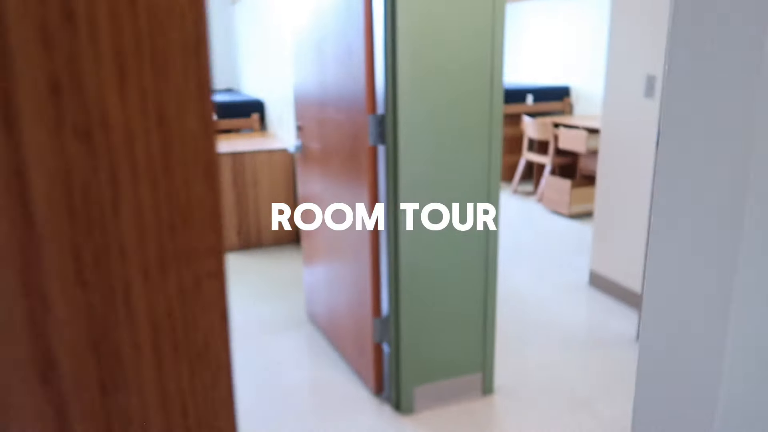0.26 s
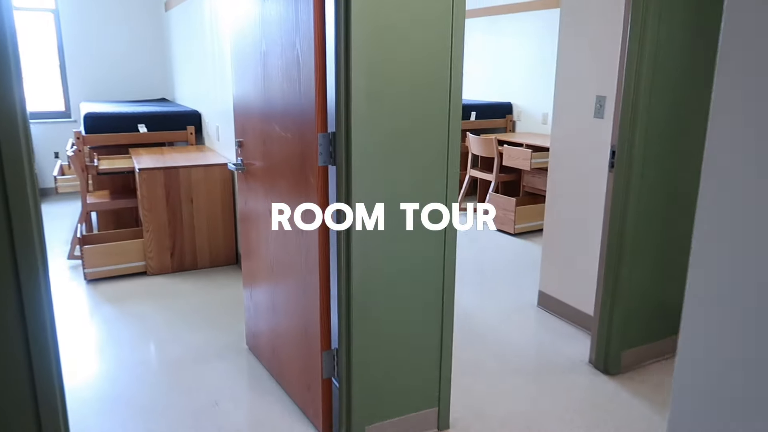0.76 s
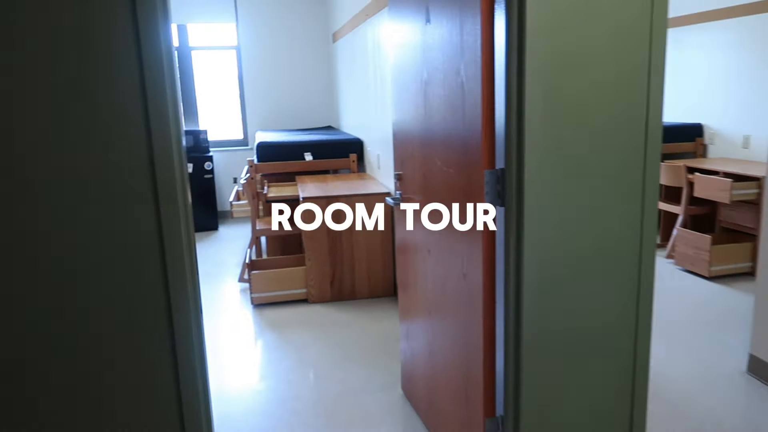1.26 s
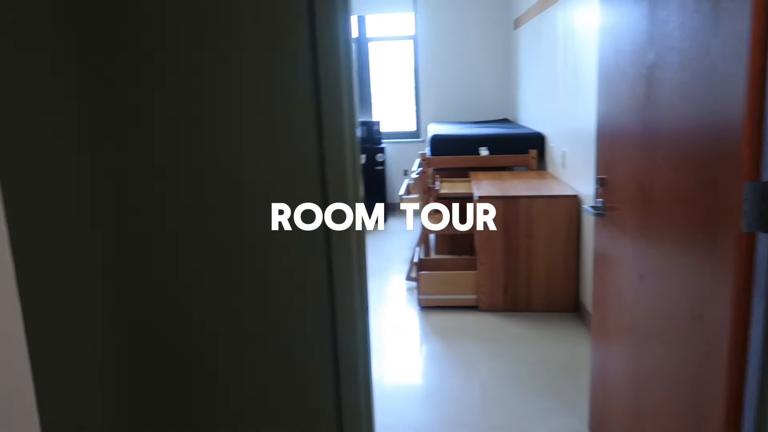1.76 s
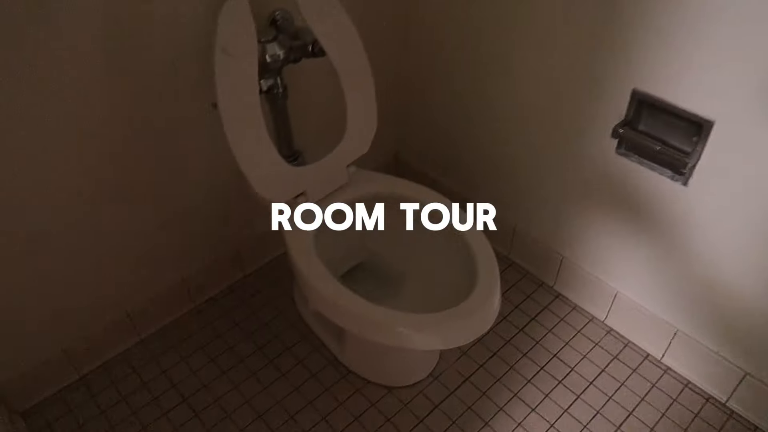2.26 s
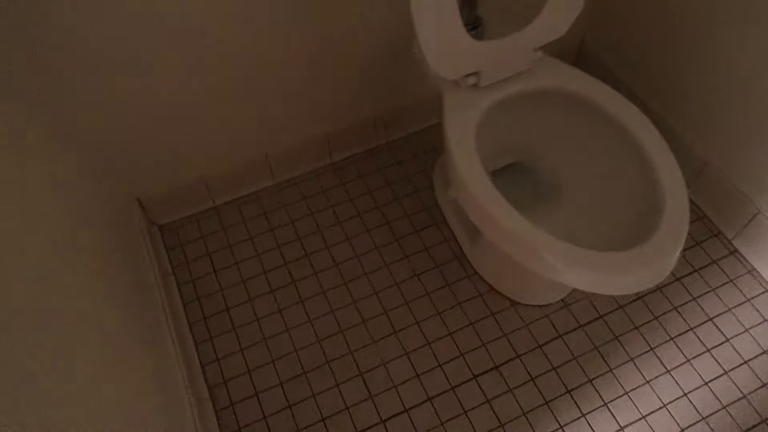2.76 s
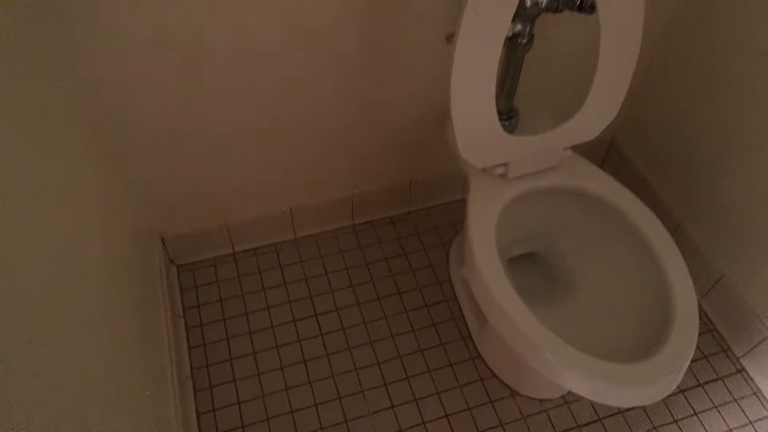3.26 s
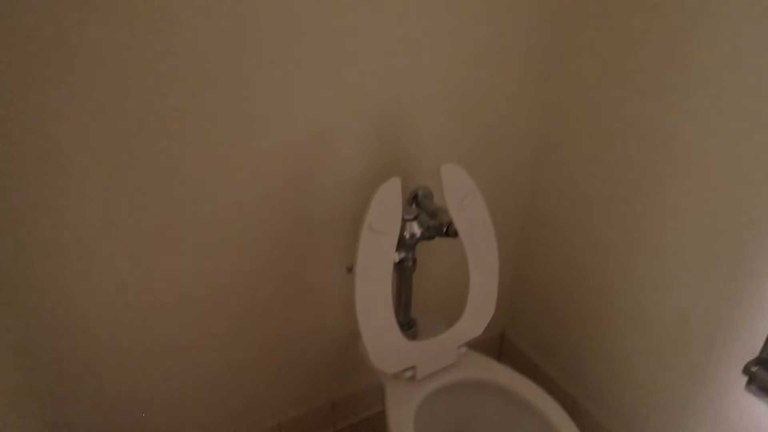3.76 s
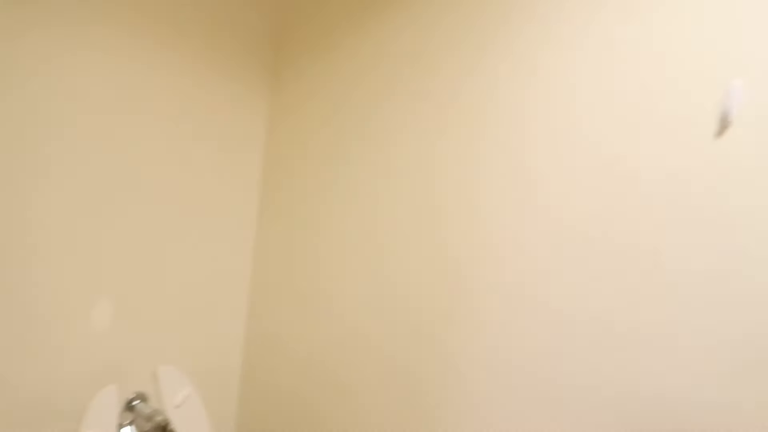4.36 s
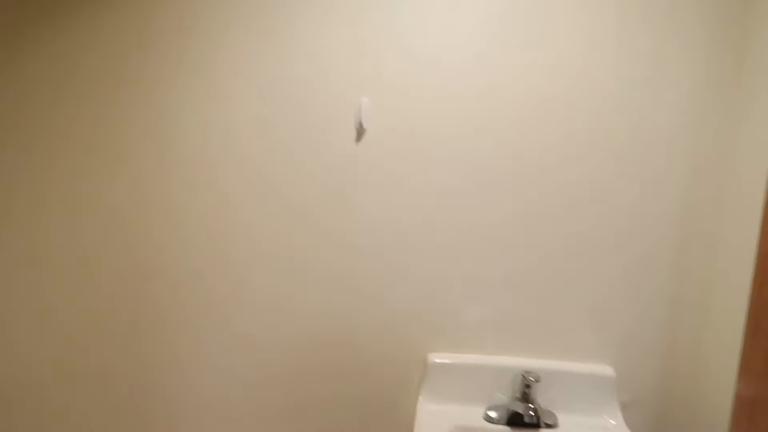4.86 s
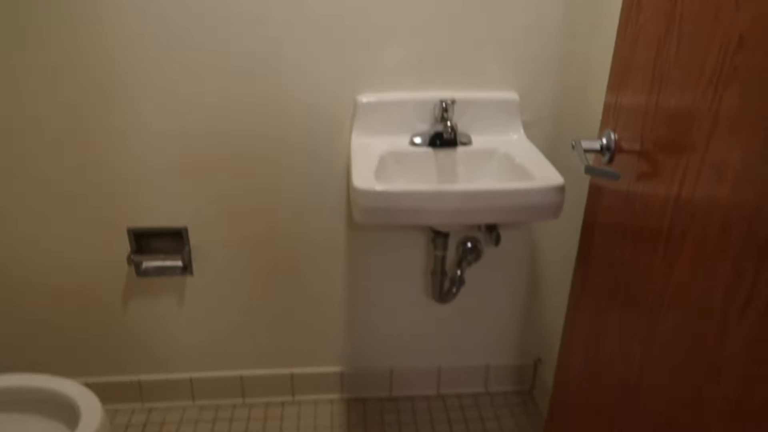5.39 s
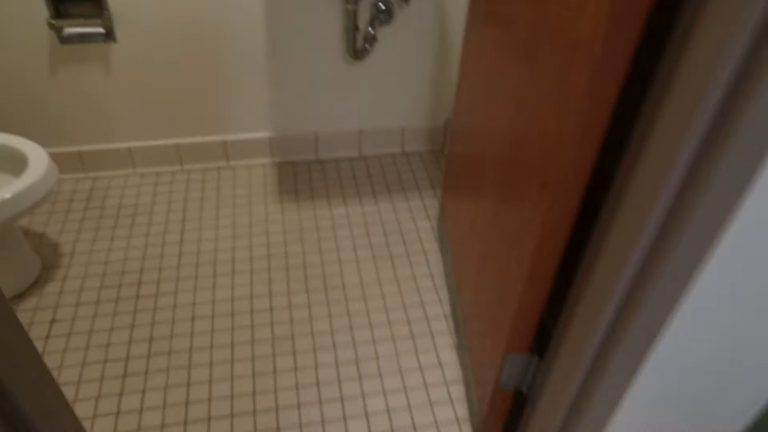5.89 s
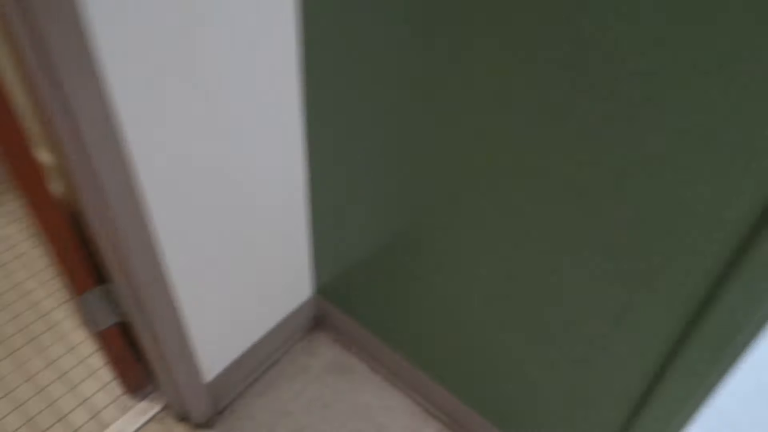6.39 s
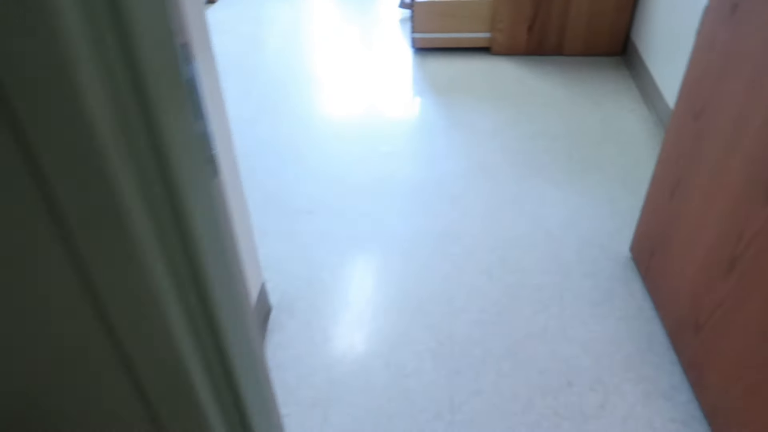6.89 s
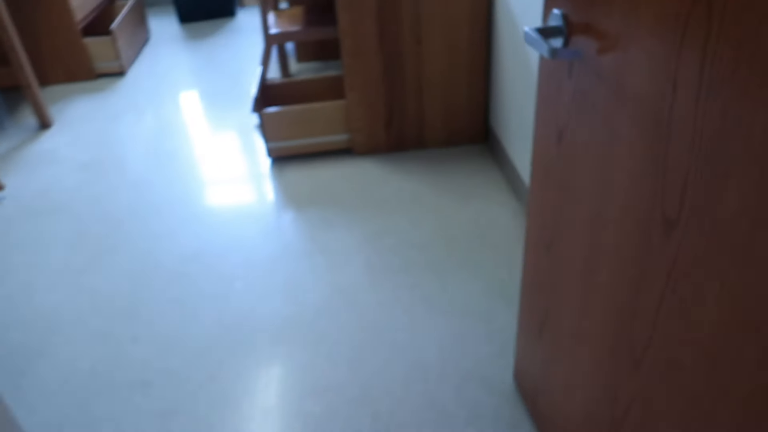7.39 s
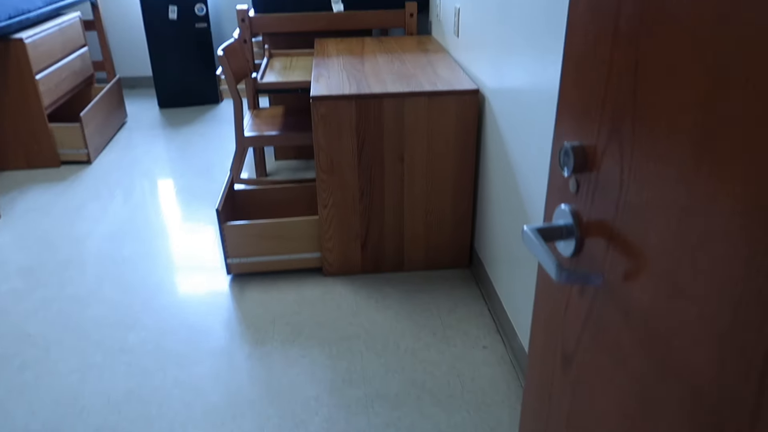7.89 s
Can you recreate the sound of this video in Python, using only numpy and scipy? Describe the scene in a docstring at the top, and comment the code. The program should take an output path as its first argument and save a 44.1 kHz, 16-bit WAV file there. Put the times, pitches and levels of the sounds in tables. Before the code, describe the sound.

Close handheld stereo sound of a walk in and out of a small tiled bathroom. A deep bump and uneven footsteps come first over humming, rumbling ventilation. A sharp click, a few scuffs and a dull pitched wall thump follow. Then a heavy wooden door slams with boom and latch clatter, hits again with a ringing handle, and settles. Afterward, fainter steps, hollow knocks and rubbing move into the drier room.

```python
"""A dormitory hallway and a small tiled bathroom: a walk in and out, over low rumble, ventilation and mains hum.
A wooden door bangs twice, then knocks more softly: filtered impact bursts ring its panel, wood and latch.
A steel bolt cracks, the handle sings, a catch snaps and a switch thumps the wall, all struck resonances.
Shoes tap and thud, short ticks ring, bodies knock, and scuffs are swelling bands of noise.
The tiles ring on after the blows, the hallway is drier, and a level control dips after the loudest ones."""
import sys
import numpy as np
from scipy import signal
from scipy.fft import rfft, irfft, next_fast_len
from scipy.io import wavfile

SR = 44100
rng = np.random.default_rng(int(sys.argv[2]) if len(sys.argv) > 2 else 0)


def to_wav(s):
    """Save 16-bit WAV."""
    ch = np.atleast_2d(s).T  # columns
    pcm = np.round(np.clip(ch, -1, 1) * 32767)  # PCM
    wavfile.write(sys.argv[1], SR, pcm.astype(np.int16))


N = 358974
TIME = np.arange(N) / SR  # seconds

# Mode levels are peak gains; event levels are drive levels, ahead of resonances, room and level control.
# Rattles are decay times of the contact; hardness is the low-pass corner that dulls it.

# door blows, base values for each contact: start_s, landing_lag_s, rattle_s, boom_db, wood_db, latch_db,
# hardness_hz, rebound_db (relative to the blow)
DOOR_BLOWS = [(4.79, 0.0066, 0.036, -33, -36, -22, 14100, -16), (4.798, .014, 0.041, 7.5, 5, 0, 12500, -30),
              (5.414, 0.013, 0.033, -7.5, -21, -12.5, 10400, -12.5),
              (5.457, .019, 0.034, 4, -5, -5.5, 4200, -17),
              (5.85, 0.011, 0.02, -17, -19, -14.5, 2440, -20.5)]
# resonances of the door panel: pitch_hz, bandwidth_hz, level_db
PANEL_MODES = [(35, 38, 36.5), (63, 41, 36.5), (114, 58, 30)]
# resonances of the door's wood and frame: pitch_hz, bandwidth_hz, level_db
WOOD_MODES = [(141, 26, 13), (216.4, 25, 28.7), (278, 27, 30.4), (363, 102, 25.3), (498, 74, 25.6),
              (598, 62, 25.4), (710, 110, 24.8), (820, 104, 26.1), (1030, 330, 21.8), (1420, 310, 21.7),
              (2430, 200, 3.7)]
# resonances of the door latch: pitch_hz, bandwidth_hz, level_db
LATCH_MODES = [(1140, 930, 22.5), (1410, 160, 25.4), (1650, 250, 21.2), (2000, 196, 28.7),
               (2200, 240, 25.9), (2980, 870, 23.7), (3160, 235, 29.2), (3990, 1070, 20.4),
               (6400, 2850, 16.1), (11700, 1700, 8.4)]
# the edge strikes, then the whole leaf lands, relative to the blow: rattle_ratio, boom_db, wood_db, latch_db
EDGE = (1.43, -8, -5.5, 0)
LANDING = (2.08, 1, -0.5, -14)
# the door then shakes loosely in its frame; each further rebound loses level
REBOUND_S, REBOUND_RATTLE_S, REBOUND_LOSS_DB, REBOUND_HARDNESS_HZ = 0.1, 0.082, 1.5, 4000
BOOM_RATTLE_SHARE = 0.85  # the panel is driven for only this share of the rattle

# the bolt cracking against the strike plate: start_s, rattle_s, level_db, hardness_hz
BOLT_CRACKS = [(4.795, 0.004, 10, 9000), (4.7995, 0.0052, 22.5, 16000), (4.8037, 0.0024, 14, 16000),
               (4.8105, 0.0024, 15, 12000), (4.8134, 0.0095, 29, 9000), (4.833, .006, 14, 12000),
               (4.8585, 0.0042, 17.5, 5000), (5.456, 0.0048, 15, 5000), (5.466, 0.005, 12, 7000),
               (5.4748, 0.0027, 15, 5000), (5.483, 0.0067, 17, 3500), (5.852, 0.0053, 6, 2650)]
# the bolt's ring: pitch_hz, bandwidth_hz, level_db
BOLT_MODES = [(1380, 99, -4), (1805, 79, 3), (2060, 51, 5), (2218, 210, -1), (2630, 98, -3),
              (2794, 60, 2.5), (3500, 410, -12), (5000, 30, -11), (11400, 5700, -10)]
# jolts to the sprung handle: start_s, level_db
HANDLE_JOLTS = [(5.416, -9), (5.459, -1), (5.682, -15), (5.852, -12)]
# the handle's thin, long tones: pitch_hz, bandwidth_hz, level_db
HANDLE_MODES = [(1670, 5, 17), (2050, 6.9, 30), (2350, 6.9, 24.5), (2940, 27, 33.5), (3300, 5.5, 34),
                (3500, 6.8, 37.5), (3600, 5.3, 27), (3980, 17, 28), (4140, 9, 16)]
# the settling leaf knocking against its stop: start_s, level_db
STOP_KNOCKS = [(4.813, -18), (4.852, -2), (5.487, -8), (5.531, -12), (5.543, -12)]
STOP_RATTLE_S = 0.0043

# the light switch being pressed: start_s, rattle_s, level_db, hardness_hz
SWITCH_PRESSES = [(4.182, 0.045, -2, 330), (4.215, 0.028, -2.5, 9000), (4.226, 0.02, 0, 2200),
                  (4.2445, 0.004, -10.5, 4500), (4.25, 0.016, -4.5, 1800), (4.287, 0.02, -9, 2400),
                  (4.325, 0.015, -10, 1800)]
# hollow wall and switch box: pitch_hz, bandwidth_hz, level_db
WALL_MODES = [(146.6, 13, 29), (214, 16.5, 25.5), (279, 25, 23), (365.5, 10.7, 32.5), (471, 34, 26),
              (700, 136, 20.5), (865, 40, 26.5), (936, 31, 26.5), (1120, 150, 16.5), (1400, 140, 18.5),
              (1590, 160, 19), (2300, 530, 11), (4440, 7100, 3), (10600, 3500, 2)]
# a catch being touched and snapping over: start_s, rattle_s, level_db
CATCH_CLICKS = [(2.89, 0.013, -21.5), (2.939, 0.017, -22), (2.976, 0.0038, -16.5), (2.9802, 0.0014, 0.5),
                (2.9856, 0.0077, -11.5)]
# the catch and its plate: pitch_hz, bandwidth_hz, level_db
CATCH_MODES = [(327, 33, 29.5), (460, 14, 26.5), (798, 145, 30), (898, 84, 35.5), (1110, 116, 34),
               (1270, 180, 31.5), (1400, 160, 28.5), (1800, 190, 24.5), (1990, 130, 26.5),
               (2554, 190, 24.5), (3220, 170, 25.5), (3590, 140, 23), (3750, 370, 19.5), (5330, 1400, 12.5),
               (6400, 780, 15), (10170, 2800, 6.5)]

# footfalls: start_s, heel_thud_db, tap_hz, tap_db
FOOTFALLS = [(.845, 18, 940, 11), (.94, 5, 4350, -8), (1.08, 13, 820, 4.5), (1.31, 3, 1210, -1),
             (1.826, 13, 840, 6), (1.975, 13, 1000, 15), (1.995, 9, 860, 12), (2.055, 7, 890, 9.5),
             (2.169, 10.5, 700, 0), (2.303, 14.5, 2350, -25), (3.626, 5.5, 1700, -4.5),
             (6.589, -21, 1330, -1), (6.889, 6, 1040, 4.5), (6.97, 12, 1200, 1), (7.318, 3, 1400, 1),
             (7.977, -8, 1680, -3)]
HEEL_HZ, HEEL_RATTLE_S = 330, 0.019
# the floor booms under the heel; level relative to the heel's thud
FLOOR_HZ, FLOOR_WIDTH_HZ, FLOOR_DB = 60.4, 6, 2.5
# the sole's roll-down time for a 0 dB tap; firmer steps are quicker (dB of time per dB of tap)
ROLL_S, ROLL_SHORTENS = 0.038, 0.19

# knocks on hollow bodies: start_s, rattle_s, pitch_hz, ring_q, level_db
KNOCKS = [(0.013, 0.018, 57, 2.6, 35), (0.135, 0.0038, 123, 5.4, 27), (0.258, 0.026, 310, 6.7, 18),
          (2.038, 0.018, 309, 18, 30), (2.051, 0.013, 290, 6.5, 25.5), (6.594, 0.0068, 284, 25, 20),
          (6.769, 0.009, 376, 3.7, 10.5), (7.318, 0.0058, 1210, 5, 11.5), (7.478, 0.0075, 229, 8.1, 23),
          (7.57, 0.0062, 490, 3.1, 12.5), (7.591, 0.0037, 476, 2.2, 3), (7.614, 0.0045, 370, 2, 11.5),
          (7.887, 0.013, 404, 10.6, 19)]
KNOCK_OVERTONE_RATIO, KNOCK_OVERTONE_DB = 2.46, -23.5  # relative to the main pitch and its level
# short ringing ticks, several within footsteps and knocks: start_s, rattle_s, pitch_hz, ring_q, level_db
TICKS = [(1.314, 0.0055, 3600, 2.6, -7.5), (2.058, .03, 640, 8, 14), (2.162, .02, 2040, 4.6, -2),
         (2.615, 0.003, 646, 7, -3), (3.623, 0.011, 1120, 12, 8.5), (7.318, 0.0072, 1300, 4.2, 6.5),
         (7.581, 0.015, 2630, 5.9, 0), (7.615, .02, 2430, 9.8, -2), (7.979, 0.084, 1420, 5, 4),
         (7.981, 0.032, 2350, 4.6, -3)]
# scuffs of soles and sleeves: start_s, swell_s, level_db, low_edge_hz
SCUFFS = [(.005, 0.014, -59, 550), (.195, 0.0093, -57, 1300), (0.336, 0.0086, -56, 1090),
          (1.546, 0.022, -45.5, 4030), (1.946, 0.011, -46, 1510), (2.262, 0.055, -36.5, 1560),
          (2.831, 0.19, -45.5, 1550), (3.896, 0.069, -42, 1930), (3.979, 0.031, -37.5, 327),
          (6.5, 0.16, -55, 1520), (6.72, 0.22, -52, 1090), (7.42, 0.18, -51, 1420),
          (7.861, 0.033, -52, 2400)]
# tilt of the rubbing hiss: pitch_hz, relative_db
FRICTION_SPECTRUM = [(2500, 3), (7000, -3.5), (12000, -5), (14000, -19)]
# the hiss rolls off at this many times its low edge, but never lower than the given frequency
SCUFF_FADE_S, SCUFF_TOP_RATIO, SCUFF_LOWEST_TOP_HZ = 0.078, 4.1, 3830
SCUFF_GRIP_DB, SCUFF_GRIP_HZ = 0.5, 36.3  # rms unevenness as surfaces catch and slip, and its upper rate

# low rumble during the walk, perhaps from handling: pitch_hz, relative_db
RUMBLE_SPECTRUM = [(12, 14), (25, 13.5), (45, 17.5), (70, -2.5), (100, -34), (250, -50)]
# duct noise: pitch_hz, relative_db
DUCT_SPECTRUM = [(45, -14), (80, -5), (125, 4), (175, 1.5), (290, -2.5), (420, -7.5), (650, -18.5),
                 (1200, -40), (3000, -69)]
# airy hiss: pitch_hz, relative_db
AIR_SPECTRUM = [(300, 8.5), (800, 11), (1500, 5), (3000, -0.5), (6000, -6.5), (11800, -14.5), (13200, -27)]
# deep boom heard in the hallway: pitch_hz, relative_db
DEEP_BOOM_SPECTRUM = [(35, -20), (55, 6), (82, 10), (115, -29), (250, -66)]
# base levels; the background curve moves all but the air
RUMBLE_DB, DUCT_DB, AIR_DB, DEEP_BOOM_DB = -43.5, -43, -55, -44
DEEP_BOOM_FOLLOWS = 2.25  # dB of boom per dB of the background curve, so it fades faster off the hallway
# background noise along the walk, highest in the hallway: time_s, offset_db
BACKGROUND_CURVE = [(0, 0.5), (2.1, -1.5), (2.4, -3), (6.1, -6), (6.5, -1), (7.2, -3), (8.14, -3.5)]
MAINS_HZ = 59.85
# hum along the walk through its standing waves, shared by partials 1, 2 and 4: time_s, base_db
HUM_CURVE = [(0.0, -39.5), (0.5, -35), (1.43, -39), (2.13, -51), (4.03, -50.5), (4.67, -42.5), (5.19, -57),
             (7.39, -41), (8.14, -43.5)]
# third hum partial, strongest by the bathroom doorway: time_s, base_db
HUM_THIRD_CURVE = [(0, -53), (5.9, -56.5), (6.25, -56.5), (6.48, -39), (6.63, -53), (6.87, -42.5),
                   (7.1, -55), (8.14, -49.5)]

# stereo width of reflections from close sources: pitch_hz, side_minus_mid_db
NEAR_WIDTH = [(60, -68), (110, -92), (220, -43), (700, -32), (1300, -25), (2400, -15), (4400, -6),
              (8000, -1.5), (12000, 8)]
# stereo width of hallway reflections and diffuse noise: pitch_hz, side_minus_mid_db
FAR_WIDTH = [(50, -35), (120, -27), (200, -15), (380, -9), (700, -4.5), (2400, -3), (4400, -1), (12000, 3)]
# reverberation of the tiled bathroom: pitch_hz, t60_s
TILE_T60 = [(60, 0.43), (160, 0.3), (420, 0.83), (1100, 1), (3000, 0.99), (7000, 0.92), (12000, 0.17)]
# reverberation of the hallway: pitch_hz, t60_s
HALL_T60 = [(100, 0.36), (1000, 0.56), (4000, 0.76), (12000, 0.042)]
# reverberation of the wall's thump: pitch_hz, t60_s
WALL_T60 = [(150, 0.47), (420, 0.76), (1100, 0.7), (3000, 0.96), (12000, 0.29)]
# reverberation of the catch, longest near 1.1 kHz: pitch_hz, t60_s
CATCH_T60 = [(400, 0.61), (1100, 0.95), (1900, 0.66), (3200, 0.75), (7000, 0.62), (12000, 0.23)]

# level control: slope is dB of reduction per dB over the threshold; power is averaged over the attack time
GAIN_THRESHOLD_DB, GAIN_SLOPE, GAIN_ATTACK_S, GAIN_RECOVERY_DB_PER_S = -23, 0.39, 0.098, 1
CUTOFF_HZ = 13800


def door_contacts(rebounds=2):
    """Split each blow into edge, landing and rebounds: start_s, rattle_s, boom, wood, latch_db, hardness_hz."""
    for s, lag_s, rattle_s, boom_db, wood_db, latch_db, hard_hz, rebound_db in DOOR_BLOWS:
        levels = np.array([boom_db, wood_db, latch_db])
        yield s, rattle_s * EDGE[0], *(levels + EDGE[1:]), hard_hz
        yield s + lag_s, rattle_s * LANDING[0], *(levels + LANDING[1:]), hard_hz
        for k in range(rebounds):
            rebound_levels = levels + rebound_db - k * REBOUND_LOSS_DB
            yield s + (k + 1) * REBOUND_S, REBOUND_RATTLE_S, *rebound_levels, REBOUND_HARDNESS_HZ


def door():
    """Each contact shakes panel, wood and latch; its own low-pass corner dulls the wood and latch."""
    boom, clatter = np.zeros((2, N))
    for s, rattle_s, boom_db, wood_db, latch_db, hard_hz in door_contacts():
        wood = from_db(wood_db) * resonate(contact(rattle_s, loose=0.93, clump_db=9), WOOD_MODES)
        latch = from_db(latch_db) * resonate(contact(rattle_s, loose=1.0, clump_db=6.5), LATCH_MODES)
        add(clatter, s, cut(wood + latch, hard_hz, "low", order=1))
        push = contact(BOOM_RATTLE_SHARE * rattle_s, loose=0.67)
        add(boom, s, from_db(boom_db) * resonate(push, PANEL_MODES))
    # the panel pushes the air directly and hardly rings on in the small room
    boom = room(boom, TILE_T60, NEAR_WIDTH, direct_db=-3.5, wet_db=-5.0,
                pan_db=-1.5, lag_ms=0.0015, build_s=0.0019)
    clatter = room(clatter, TILE_T60, NEAR_WIDTH, direct_db=-3.0, wet_db=-1.0,
                   pan_db=2.0, lag_ms=0.022, build_s=0.00049)
    return boom + clatter


def bolt():
    """Steel on steel, close to the microphones: a short, hard ring."""
    cracks = np.zeros(N)
    for s, rattle_s, db, hard_hz in BOLT_CRACKS:
        crack = contact(rattle_s, loose=0.88, clump_db=8.0)
        add(cracks, s, from_db(db) * cut(crack, hard_hz, "low", order=1))
    return room(resonate(cracks, BOLT_MODES), TILE_T60, NEAR_WIDTH, direct_db=-0.5, wet_db=-13.5,
                pan_db=2.0, lag_ms=0.034, build_s=0.002)


def handle():
    """The sprung handle rings with thin, long tones after every jolt."""
    jolts = np.zeros(N)
    for s, db in HANDLE_JOLTS:
        add(jolts, s, from_db(db) * contact(0.0019, loose=0.29))
    return room(resonate(jolts, HANDLE_MODES), TILE_T60, NEAR_WIDTH, direct_db=-10, wet_db=-9.0,
                pan_db=0.0, lag_ms=0.068, build_s=.003)


def door_stop():
    """The settling leaf knocks briefly against its stop, shaking wood and latch."""
    hits = np.zeros(N)
    for s, db in STOP_KNOCKS:
        add(hits, s, from_db(db) * contact(STOP_RATTLE_S, loose=0.96))
    knock = resonate(hits, WOOD_MODES) + from_db(-12) * resonate(hits, LATCH_MODES)
    return room(knock, TILE_T60, NEAR_WIDTH, direct_db=-2.0, wet_db=-15,
                pan_db=1.0, lag_ms=0.035, build_s=0.0017)


def light_switch():
    """The switch is pushed over; the hollow wall behind it answers with a pitched thump."""
    thumps = np.zeros(N)
    for s, rattle_s, db, hard_hz in SWITCH_PRESSES:
        thump = resonate(contact(rattle_s, loose=0.91), WALL_MODES)
        add(thumps, s, from_db(db) * cut(thump, hard_hz, "low"))
    return room(thumps, WALL_T60, NEAR_WIDTH, direct_db=-3.5, wet_db=-3.5,
                pan_db=0.3, lag_ms=0.048, build_s=0.00063)


def catch():
    """A catch is touched, then snaps over close by, ringing its plate."""
    clicks = np.zeros(N)
    for s, rattle_s, db in CATCH_CLICKS:
        add(clicks, s, from_db(db) * contact(rattle_s, loose=0.7))
    ring = cut(resonate(clicks, CATCH_MODES), 330, "high", order=1)
    return room(ring, CATCH_T60, NEAR_WIDTH, direct_db=-2.5, wet_db=-3.5,
                pan_db=4.0, lag_ms=0.049, build_s=0.00044)


def footsteps(thud_q=2.5, tap_q=2.22, sole_hz=2700):
    """The sole taps close and fairly dry; the heel's thud and floor boom are more reverberant."""
    thuds, taps = np.zeros((2, N))
    for s, thud_db, tap_hz, tap_db in FOOTFALLS:
        heel_modes = [(HEEL_HZ, HEEL_HZ / thud_q, thud_db), (FLOOR_HZ, FLOOR_WIDTH_HZ, thud_db + FLOOR_DB)]
        thud = resonate(contact(HEEL_RATTLE_S, loose=0.97), heel_modes)
        add(thuds, s, cut(thud, 3 * HEEL_HZ, "low"))
        roll_s = ROLL_S * from_db(-ROLL_SHORTENS * tap_db)
        tap = resonate(contact(roll_s, loose=1.0), [(tap_hz, tap_hz / tap_q, tap_db)])
        add(taps, s, cut(tap, sole_hz, "low", order=1))
    thuds = room(thuds, HALL_T60, FAR_WIDTH, direct_db=-4.5, wet_db=-1,
                 pan_db=0.0, lag_ms=.01, build_s=0.01)
    taps = room(taps, HALL_T60, FAR_WIDTH, direct_db=-1.5, wet_db=-5.5,
                pan_db=0.5, lag_ms=0.025, build_s=0.0006)
    return thuds + taps


def knocks(overtone_damping=4.0, soft_hz=3000):
    """A brief soft contact rings a hollow body and one overtone."""
    bodies = np.zeros(N)
    for s, rattle_s, hz, body_q, db in KNOCKS:
        upper_hz = KNOCK_OVERTONE_RATIO * hz
        upper_width_hz = overtone_damping * upper_hz / body_q
        modes = [(hz, hz / body_q, db), (upper_hz, upper_width_hz, db + KNOCK_OVERTONE_DB)]
        add(bodies, s, resonate(contact(rattle_s, loose=1.0), modes))
    return room(cut(bodies, soft_hz, "low"), HALL_T60, FAR_WIDTH, direct_db=-4.5, wet_db=-8.0,
                pan_db=4.5, lag_ms=0.011, build_s=0.0018)


def ticks():
    """Each light contact rings one resonance, which the walls carry on."""
    rings = np.zeros(N)
    for s, rattle_s, hz, ring_q, db in TICKS:
        add(rings, s, resonate(contact(rattle_s, loose=0.89), [(hz, hz / ring_q, db)]))
    return room(rings, TILE_T60, FAR_WIDTH, direct_db=-5.0, wet_db=-3,
                pan_db=-1.0, lag_ms=0.047, build_s=0.0015)


def scuffs():
    """Rubbing is an uneven hiss that swells and fades with the stroke."""
    rubbing, t = np.zeros(N), TIME[:SR]
    for s, swell_s, db, low_hz in SCUFFS:
        high_hz = max(SCUFF_TOP_RATIO * low_hz, SCUFF_LOWEST_TOP_HZ)
        hiss = cut(rng.standard_normal(SR), low_hz, "high")
        hiss = colour(cut(hiss, high_hz, "low", order=1), FRICTION_SPECTRUM)
        swell = np.minimum(t / swell_s, 1) ** .5
        fade = np.exp(-np.maximum(t - swell_s, 0) / SCUFF_FADE_S)
        grip = from_db(SCUFF_GRIP_DB * rms_one(cut(rng.standard_normal(SR), SCUFF_GRIP_HZ, "low")))
        add(rubbing, s, from_db(db) * swell * fade * rms_one(grip * hiss))
    return room(rubbing, HALL_T60, FAR_WIDTH, direct_db=-0.5, wet_db=-11.0,
                pan_db=0.5, lag_ms=0.029, build_s=0.0018)


def diffuse_noise(spectrum, waver_db):
    """Coloured noise from all around, its level wavering slowly by waver_db rms."""
    mid, side = (rms_one(colour(white, spectrum)) for white in rng.standard_normal((2, N)))
    waver = rms_one(cut(rng.standard_normal(N), 6.4, "low"))
    return stereo(mid, colour(side, FAR_WIDTH)) * from_db(waver_db * waver)


def low_noises():
    """Low rumble and deep boom are wavering low noises that follow the walk."""
    offset_db, = in_time(BACKGROUND_CURVE)
    rumble = from_db(RUMBLE_DB + offset_db) * diffuse_noise(RUMBLE_SPECTRUM, waver_db=5.0)
    boom_db = DEEP_BOOM_DB + DEEP_BOOM_FOLLOWS * offset_db
    return rumble + from_db(boom_db) * diffuse_noise(DEEP_BOOM_SPECTRUM, waver_db=0.5)


def ventilation():
    """Duct noise follows the walk; the airy hiss wavers about one base level."""
    offset_db, = in_time(BACKGROUND_CURVE)
    duct = from_db(DUCT_DB + offset_db) * diffuse_noise(DUCT_SPECTRUM, waver_db=1.45)
    return duct + from_db(AIR_DB) * diffuse_noise(AIR_SPECTRUM, waver_db=2.23)


def mains_hum(mains_db=-14, second_db=-1.5, fourth_db=-15, swell_db=1.0):
    """Four sine partials of the mains rate swell and sink in standing waves along the walk."""
    hum_db, = in_time(HUM_CURVE)
    third_db, = in_time(HUM_THIRD_CURVE)
    partials_db = [hum_db + mains_db, hum_db + second_db, third_db, hum_db + fourth_db]
    hum = 0
    for k, db in enumerate(partials_db, 1):
        swell = swell_db * rms_one(cut(rng.standard_normal(N), 1.1, "low"))
        partial = np.sqrt(2) * np.sin(2 * np.pi * (k * MAINS_HZ * TIME + rng.random()))
        hum = hum + from_db(db + swell) * partial
    return hum


def contact(rattle_s, loose, clump_db=0, clump_hz=70):
    """A first impact plus a dying burst of tiny ones, mixed by energy share 'loose', perhaps in clumps."""
    t = TIME[:SR // 2]
    loose = np.clip(loose, 0, 1)
    clumps = np.tanh(rms_one(cut(rng.standard_normal(len(t)), clump_hz, "low")))
    burst = rng.standard_normal(len(t)) * np.exp(-t / rattle_s) * from_db(clump_db * clumps)
    force = np.sqrt(loose) * burst / np.linalg.norm(burst) + np.sqrt(1 - loose) * (t == 0)
    # flatten the spectrum: the colour comes from what is struck
    flat = irfft(np.exp(1j * np.angle(rfft(force, SR))), SR)[:len(t)]
    flat = flat * np.exp(-(t / (4 * rattle_s)) ** 2)
    return flat / np.linalg.norm(flat)


def resonate(x, modes):
    """A struck body: parallel two-pole resonances of alternating sign."""
    out = 0
    for k, (hz, width_hz, db) in enumerate(modes):
        r = np.exp(-np.pi * width_hz / SR)
        poles = [1, -2 * r * np.cos(2 * np.pi * hz / SR), r * r]
        gain = (-1) ** k * from_db(db) * (1 - r * r) / 2
        out = out + gain * signal.lfilter([1, 0, -1], poles, x + 1e-18)
    return out


def tail(t60s, build_s):
    """Dense reflections that build up, then die band by band."""
    t = TIME[:SR]
    white, hz = rfft(rng.standard_normal(SR)), np.fft.rfftfreq(SR, 1 / SR)
    edges = np.r_[0, np.geomspace(90, SR / 2, 36)]
    out = 0
    for low, high in zip(edges, edges[1:]):
        band = irfft(white * ((hz >= low) & (hz < high)), SR)
        decay = from_db(-60 * t / at_hz(t60s, (low + high) / 2))
        band = band * decay * (1 - np.exp(-t / build_s))
        # energy in proportion to bandwidth
        out = out + band / np.linalg.norm(band) * np.sqrt(2 * (high - low) / SR)
    return out


def room(x, t60s, width, direct_db, wet_db, pan_db, lag_ms, build_s):
    """Direct sound reaches the left microphone just before the right; reflections spread in stereo."""
    response = from_db(wet_db) * stereo(tail(t60s, build_s), colour(tail(t60s, build_s), width))
    taps = np.arange(-6, 18)  # sinc taps place the arrivals between samples
    left = from_db(direct_db + pan_db / 2) * np.sinc(taps)
    right = from_db(direct_db - pan_db / 2) * np.sinc(taps - SR * lag_ms / 1000)
    response[:, :len(taps)] += np.array([left, right])
    return signal.fftconvolve(x[None], response, axes=1)[:, :N]


def gain_control(x):
    """Loud blows turn the level down; it creeps back up, so the background sinks and recovers."""
    keep = np.exp(-1 / (GAIN_ATTACK_S * SR))
    power = signal.lfilter([1 - keep], [1, -keep], np.mean(x ** 2, axis=0))
    level_db = 10 * np.log10(power + 1e-12)
    excess_db = GAIN_SLOPE * np.maximum(level_db - GAIN_THRESHOLD_DB, 0)
    recovery_db = GAIN_RECOVERY_DB_PER_S * TIME
    # hold the deepest reduction so far, less what has recovered since
    return x * from_db(recovery_db - np.maximum.accumulate(excess_db + recovery_db))


def from_db(db):
    """Decibels to gain."""
    return 10 ** (np.asarray(db) / 20)


def rms_one(x):
    """Scale to unit rms."""
    return x / np.sqrt(np.mean(x ** 2) + 1e-20)


def in_time(rows):
    """One curve per column, joined by straight lines."""
    s, *columns = np.transpose(rows)
    return [np.interp(TIME, s, c) for c in columns]


def at_hz(points, hz):
    """Read a table on a log-frequency axis."""
    f, value = np.transpose(points)
    return np.interp(np.log(np.maximum(hz, 1)), np.log(f), value)


def colour(x, spectrum):
    """Filter a sound by a spectrum table."""
    size = next_fast_len(len(x))
    gain = from_db(at_hz(spectrum, np.fft.rfftfreq(size, 1 / SR)))
    return irfft(rfft(x, size) * gain, size)[:len(x)]


def cut(x, hz, kind, order=2):
    """Low- or high-pass."""
    return signal.sosfilt(signal.butter(order, min(hz, .45 * SR), kind, fs=SR, output="sos"), x)


def add(track, s, sound):
    """Mix a sound in at time s."""
    start = max(0, round(s * SR))
    track[start:start + len(sound)] += sound[:max(0, N - start)]


def stereo(mid, side):
    """Mid and side to left and right."""
    return np.array([mid + side, mid - side])


def scene():
    """Everything heard along the walk."""
    door_sounds = door() + bolt() + handle() + door_stop()
    fixtures = light_switch() + catch()
    movement = footsteps() + knocks() + ticks() + scuffs()
    background = low_noises() + ventilation() + mains_hum()
    return door_sounds + fixtures + movement + background


def record(dry):
    """The gain rides the level, peaks clip at full scale, then a steep low-pass cuts the top."""
    clipped = np.clip(gain_control(dry), -1, 1)
    return signal.sosfilt(signal.ellip(8, .2, 80, CUTOFF_HZ, fs=SR, output="sos"), clipped)


dry = scene()
out = record(dry)
to_wav(out)
```